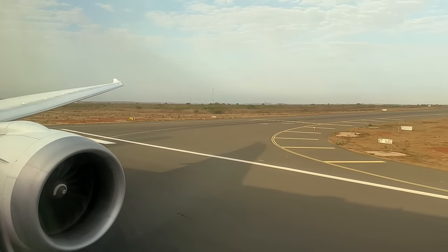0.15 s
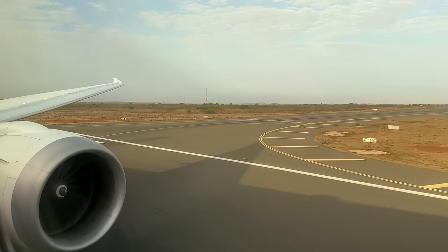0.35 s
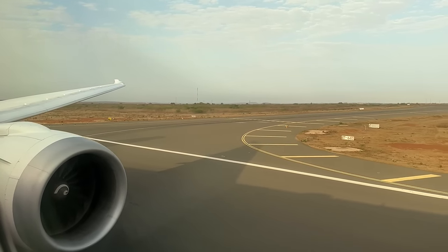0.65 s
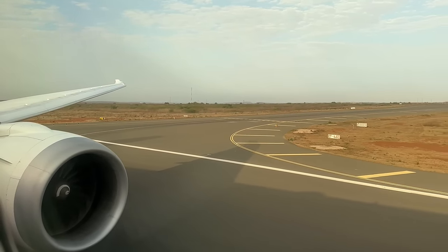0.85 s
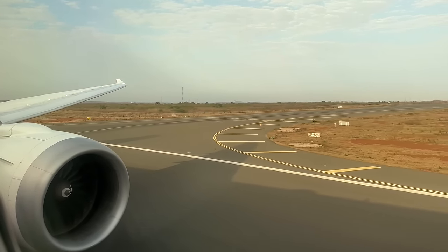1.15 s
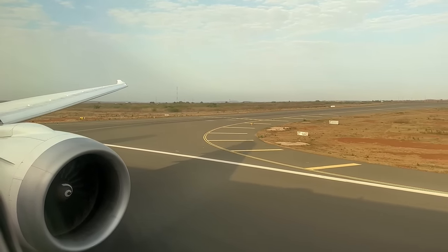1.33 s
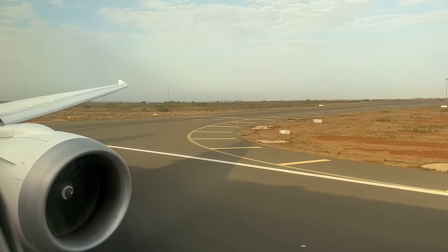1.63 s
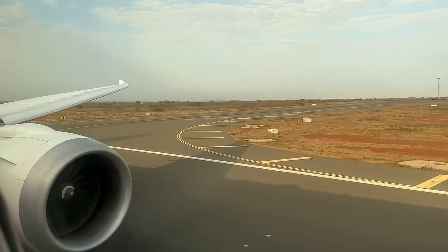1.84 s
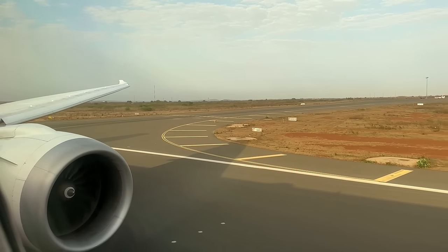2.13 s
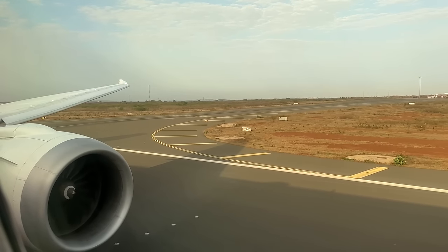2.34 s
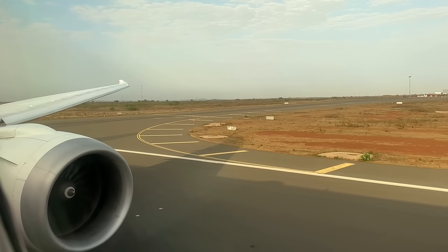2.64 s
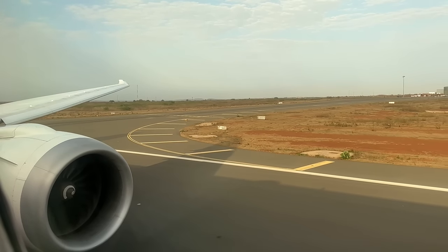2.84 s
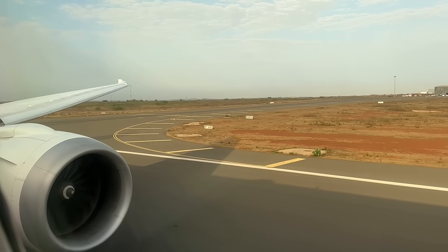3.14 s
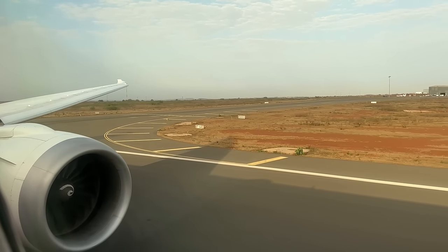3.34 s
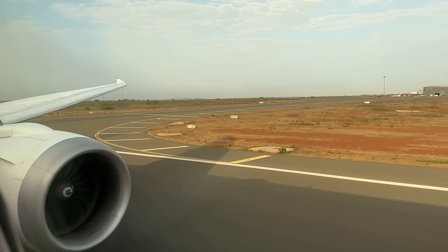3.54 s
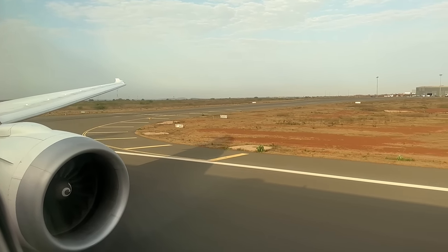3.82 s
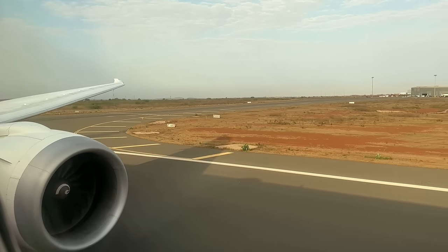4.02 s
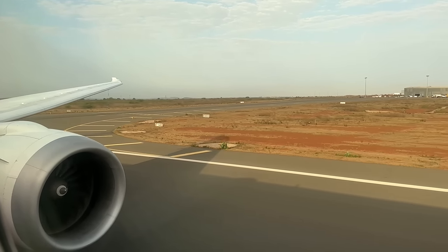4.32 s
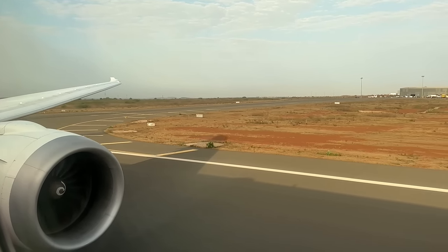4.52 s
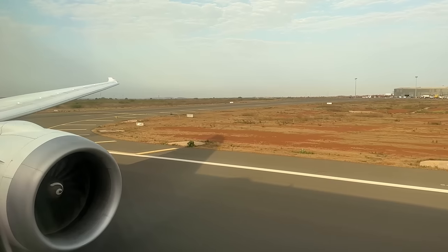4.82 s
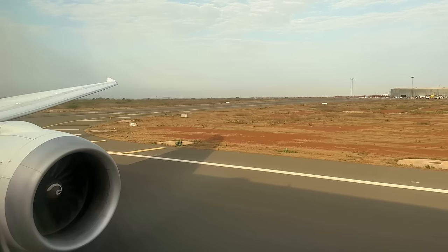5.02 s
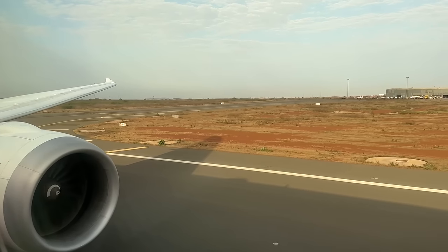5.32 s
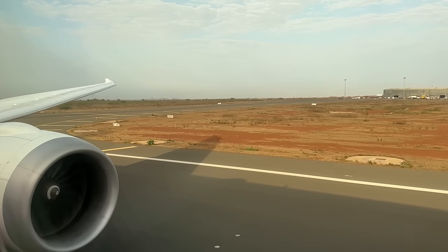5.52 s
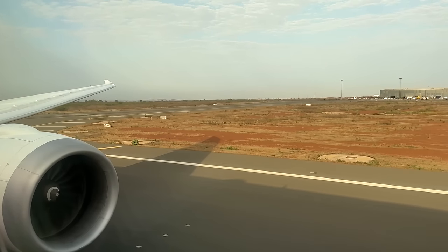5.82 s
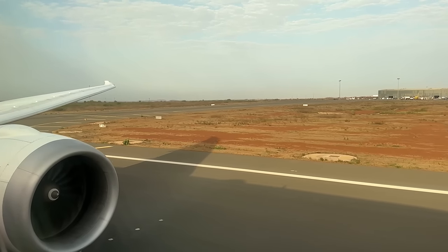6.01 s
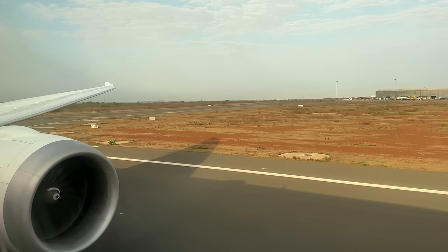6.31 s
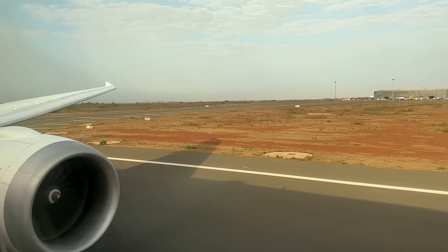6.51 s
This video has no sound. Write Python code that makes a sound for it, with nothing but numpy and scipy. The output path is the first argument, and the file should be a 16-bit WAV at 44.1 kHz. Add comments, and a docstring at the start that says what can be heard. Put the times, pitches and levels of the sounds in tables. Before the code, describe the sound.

Continuous low jet rumble fills a closed cabin, bass-heavy and slightly stronger on the left, under thin hiss, a faint steady whine and short wavering hums. Just before three seconds, hard hollow plastic knocks rattle close to the microphone. Afterwards the bass grows heavier and the engine tone rises gradually, then faster near the end, joined by a small motor's buzz.

```python
"""A low engine rumble fills an airliner cabin by a window ahead of the wing, as the engines begin
to spool up on the runway. Shaped noise makes the rumble, the roar through the wall, a treble hiss and the
air vents' whistle. Wavering sines hum for the machines, a pump and a motor, and climb for the fan's blade tone.
Noise snaps and decaying shell modes make a fitting clack nearby. All of it is spread between left and right."""
import sys
import numpy as np
from scipy import signal
from scipy.fft import rfft, irfft, next_fast_len
from scipy.io import wavfile
from scipy.ndimage import uniform_filter1d, map_coordinates

SR = 44100
rng = np.random.default_rng(int(sys.argv[2]) if len(sys.argv) > 2 else 0)


def transcribe(u):
    """Save the signal u as a 16-bit wav file named by the first command-line argument.

    u: samples, shape (n,) or (channels, n), limited to [-1, 1]; the rate is SR.
    q: integer samples, one column per channel.
    """
    v = np.clip(np.atleast_2d(u).T, -1, 1)
    q = np.round(v * 32767).astype(np.int16)
    wavfile.write(sys.argv[1], SR, q)


N = 293706
T = np.arange(N) / SR  # time of each sample, s


def amp(db):
    """Decibels to an amplitude factor."""
    return 10 ** (np.asarray(db) / 20)


def unit(x):
    """x scaled to an rms of 1."""
    return x / np.sqrt(np.mean(x ** 2) + 1e-20)


def ramp(start, length):
    """Climbs from 0 to 1 over length seconds."""
    return np.clip((T - start) / length, 0, 1)


def curves(rows):
    """One value per sample for each column after the time."""
    s, *cols = np.transpose(rows)
    return [np.interp(T, s, c) for c in cols]


def along(points, hz):
    """Each column after the frequency, read on a log axis."""
    f, *cols = np.transpose(points)
    return [np.interp(np.log(hz + 1), np.log(f + 1), c) for c in cols]


def wobble(rate):
    """A smooth random curve, rate knots a second."""
    steps = np.arange(0, N + 64, 64)
    knots = rng.standard_normal(int(N * rate / SR) + 4)
    smooth = map_coordinates(knots, [steps * rate / SR])
    return np.interp(np.arange(N), steps, smooth)


def filtered(x, response):
    """x shaped by a (possibly complex) response of frequency."""
    n = x.shape[-1]
    m = next_fast_len(n + 8192)
    return irfft(rfft(x, m) * response(np.fft.rfftfreq(m, 1 / SR)), m)[..., :n]


def panned(x, db):
    """Left louder than right by db, at the same mean power."""
    gain = amp(np.array([db / 2, -db / 2]))
    return x * (gain / np.sqrt(np.mean(gain ** 2, axis=0))).reshape(2, -1)


# Stereo image by frequency: balance, likeness and phase between left and right:
# (frequency [Hz], left-right balance [dB], likeness [0-1], left phase lead [rad])
STEREO_IMAGE = [(25, 0, .98, -.2), (60, -1, .99, -.55), (110, -3.3, .97, -.5), (160, -3.1, .9, -.65),
                (230, -6, .93, -.6), (290, -4.4, .8, -.3), (350, -6.6, .15, .5), (500, -8.5, .45, 1.9),
                (750, -7.3, .85, 2.05), (1000, -4.6, .7, 1.7), (1300, -7.3, .45, 2.4),
                (1700, -7.2, .5, 2.1), (2300, -3.8, .25, .75), (4000, -2.1, .15, .3), (4800, 1.2, .7, -.3),
                (5600, -3.5, .15, 0), (7500, -1.5, .5, .4), (8600, -.9, .7, 1.5), (9200, -.4, .95, 3.1),
                (10300, -.4, .95, 3.2), (11200, -.4, .95, 6.2), (13400, -.4, .95, 6.3),
                (14200, -.4, .95, 9.4), (16000, -.4, .95, 9.5)]


def in_stereo(pair):
    """Two sounds become left and right: the first reaches both sides, the second only adds to the right."""
    def mix(hz):
        balance_db, alike, lead = along(STEREO_IMAGE, hz)
        alike = np.clip(alike, 0, 1)
        shared = panned(np.array([np.exp(.5j * lead), alike * np.exp(-.5j * lead)]), balance_db)
        own = panned(np.array([0 * hz, np.sqrt(1 - alike ** 2)]), balance_db)
        return np.stack([shared, own], axis=1)
    return filtered(pair, mix).sum(axis=1)


def rush(spectrum, patchy_db):
    """Stereo noise of rms 1, with patches of random gain, silent outside its spectrum."""
    z = signal.stft(rng.standard_normal((2, N)), nperseg=512)[2]
    # smooth over 6 frequency bins, then 12 frames
    field = uniform_filter1d(rng.standard_normal(z.shape[1:]), 6, 0)
    field = uniform_filter1d(field, 12, 1)
    pair = signal.istft(z * amp(patchy_db * unit(field)), nperseg=512)[1][:, :N]

    def colour(hz):
        inside = (hz >= spectrum[0][0]) & (hz < spectrum[-1][0])
        return amp(along(spectrum, hz)[0]) * inside
    return unit(in_stereo(filtered(pair, colour)))


def tone(hz, db, wander_hz, flicker_db):
    """A sine around a given rms level whose pitch and strength waver."""
    phase = 2 * np.pi * (np.cumsum(hz + wander_hz * wobble(12)) / SR + rng.random())
    return np.sqrt(2) * amp(db + flicker_db * wobble(16)) * np.sin(phase)


# Colour of the engine rumble in the cabin's modes: (frequency [Hz], relative level per Hz [dB])
RUMBLE_COLOUR = [(18, -57), (30, -56), (42, -40.5), (58, -36.5), (68, -35.5), (80, -40.5), (95, -41.5),
                 (128, -40.5), (148, -46.5), (190, -43), (215, -45), (250, -45.5), (300, -50.5),
                 (340, -62.5)]
# Rumble fader, ahead of the thinning and deepening: (time [s], level [dB])
RUMBLE_LEVEL = [(0, -18.5), (.3, -20), (1.2, -18), (2.4, -19.5), (3.3, -18.5), (3.9, -20.5), (4.5, -23),
                (5.6, -22), (6.1, -20), (6.66, -21)]
# gain of the deepest rumble before and after thrust builds; middle and half-length of the change
DEEPEN_DB, DEEPEN_S, DEEPEN_OVER_S = (-2.5, 2.5), 3.75, 0.21
THIN_HZ, THIN_DB = 235, -1  # the top of the rumble thins as the bottom deepens


def engine_rumble():
    """Modal-coloured noise swells and sinks; as thrust builds its bottom deepens and its top thins."""
    rumble = amp(curves(RUMBLE_LEVEL)[0] + 0.69 * wobble(3.105)) * rush(RUMBLE_COLOUR, patchy_db=-0.58)
    thrust = ramp(DEEPEN_S - DEEPEN_OVER_S, 2 * DEEPEN_OVER_S)
    top = filtered(rumble, lambda hz: 1 - 1 / (1 + (hz / THIN_HZ) ** 12))
    rumble += (amp(THIN_DB * thrust) - 1) * top
    before, after = DEEPEN_DB
    depth_db = before + (after - before) * thrust
    bottom = filtered(rumble, lambda hz: 1 / (1 + (hz / 105) ** 6))
    return rumble + (amp(depth_db) - 1) * bottom


# Fader of a narrow noise band near 190 Hz, rising and falling unevenly: (time [s], level [dB])
LOW_BAND_LEVEL = [(0, -19.5), (.45, -27.5), (1.2, -33.5), (2.4, -31), (3.6, -39), (4.4, -22), (4.8, -29),
                  (5.9, -27.5), (6.06, -19.5), (6.16, -25), (6.25, -16.5), (6.4, -21.5), (6.48, -27.5),
                  (6.66, -25.5)]
LOW_BAND_HZ, LOW_BAND_WIDTH_HZ = 189.9, 28.5


def narrow_low_band():
    """Noise through one narrow resonant peak, rising and falling unevenly."""
    peak = lambda hz: 1 / (1 + ((hz - LOW_BAND_HZ) / LOW_BAND_WIDTH_HZ * 2) ** 2)
    band = unit(filtered(rng.standard_normal((2, N)), peak))
    return amp(curves(LOW_BAND_LEVEL)[0]) * in_stereo(band)


# Colour of the roar coming through the wall: (frequency [Hz], relative level per Hz [dB])
ROAR_COLOUR = [(340, -59), (400, -63), (470, -65), (600, -63), (720, -64), (900, -67.5), (1100, -70),
               (1250, -71), (1450, -72), (1700, -72), (1800, -77), (2300, -80), (2700, -87), (3200, -87)]
ROAR_DB, ROAR_DB_PER_S = -34, -0.21  # level at the start and its slow sinking


def wall_roar(flutter):
    """Mid-band noise through the wall, sinking slowly under a quick flutter."""
    level_db = ROAR_DB + ROAR_DB_PER_S * T + .3 * flutter + .3 * wobble(3)
    return amp(level_db) * rush(ROAR_COLOUR, patchy_db=.9)


# Colour of the treble hiss, thinner from about 9.7 to 13.7 kHz:
# (frequency [Hz], relative level per Hz [dB])
HISS_COLOUR = [(3200, -81.5), (3800, -85), (4550, -86), (4960, -84.5), (5100, -85.5), (5400, -85),
               (6200, -91.5), (7500, -90), (8800, -88), (9700, -100.5), (10600, -108), (11300, -100),
               (12400, -99), (13700, -103), (16000, -89)]
HISS_DB, HISS_DB_PER_S = -54.5, -0.3648  # level at the start and its slow sinking


def treble_hiss(flutter):
    """Treble noise sinking slowly, sharing the roar's quick flutter."""
    level_db = HISS_DB + HISS_DB_PER_S * T + 0.21 * flutter + 0.54 * wobble(2.7)
    return amp(level_db) * rush(HISS_COLOUR, patchy_db=1.7)


# The vents' whistle band: (frequency [Hz], relative level per Hz [dB])
WHISTLE_COLOUR = [(4590, -14), (4690, -5), (4715, 0), (4780, -1.5), (4860, 0), (4885, -6), (4930, -14)]
# Whistle fader: (time [s], level [dB])
WHISTLE_LEVEL = [(0, -59), (.3, -60.5), (.47, -56.5), (.7, -59), (2.3, -61), (3.1, -60.5), (3.8, -61),
                 (4.35, -63.5), (4.58, -57), (4.8, -64), (5.4, -65), (5.7, -63.5), (6, -63.5), (6.66, -65)]


def vent_whistle():
    """A narrow band of noise, breathy rather than pure, with a fast tremble."""
    level_db = curves(WHISTLE_LEVEL)[0] + 0.77 * wobble(24)
    return amp(level_db) * rush(WHISTLE_COLOUR, patchy_db=1.1)


# Steady machine tones: (frequency [Hz], level [dB], wander [Hz])
STEADY_TONES = [(78, -28, 3.5), (704, -60, 12), (1127, -60, 2), (4323, -78, 3), (5122, -81, 5),
                (7806, -82, 12), (8425, -84, 8), (8796, -83, 3), (11186, -85, 1.5)]


def machine_tones():
    """Sines held throughout, each wavering in pitch and strength."""
    return sum(tone(hz, db, wander, 2.5) for hz, db, wander in STEADY_TONES)


# Fader of a thin steady whine: (time [s], level [dB])
WHINE_LEVEL = [(0, -58), (2, -55), (4, -54), (4.7, -51.5), (5.5, -54), (6.66, -56)]


def thin_whine():
    """One wavering sine at a steady pitch, riding its fader."""
    return tone(1384, curves(WHINE_LEVEL)[0], 1.5, 2.5)


# Short tones that come and go: (start [s], end [s], frequency [Hz], level [dB])
SHORT_TONES = [(.2, .45, 975, -50), (1.0, 1.42, 1126, -49), (1.55, 1.8, 1128, -53), (1.42, 2.05, 1890, -57),
               (1.88, 2.14, 1126, -49), (2.05, 2.48, 1130, -56), (3.58, 3.92, 1125, -50),
               (4.7, 5.5, 1735, -60), (5.85, 6.4, 1114, -51)]


def passing_tones():
    """Brief sines, each faded in and out over a tenth of a second."""
    out = np.zeros(N)
    for start, end, hz, db in SHORT_TONES:
        gate = ramp(start, .1) * (1 - ramp(end - .1, .1))
        out += gate * tone(hz, db, 1.5, 1.5)
    return out


PUMP_S, PUMP_RISE_S, PUMP_FALL_S = (1.28, 3.5), 0.25, 0.21  # on and off, and the fades
PUMP_DB = (-32, -34.5)  # fundamental and octave
PUMP_HZ, PUMP_HZ_PER_S = 127.3, .45  # pitch at time zero and its slow rise


def pump():
    """A pump hums on a fundamental and its octave, its pitch creeping up."""
    running = ramp(PUMP_S[0], PUMP_RISE_S) * (1 - ramp(PUMP_S[1], PUMP_FALL_S))
    hz = PUMP_HZ + PUMP_HZ_PER_S * T
    return running * (tone(hz, PUMP_DB[0], 1, 2) + tone(2 * hz, PUMP_DB[1], 1, 1.5))


# Clacks and ticks of a fitting: (time [s], snap noise level at onset [dB], snap's strongest pitch [Hz],
# knock level [dB], knock's tilt [dB per octave], left-right balance beyond the stereo image's [dB])
CONTACTS = [(1.827, -43.5, 5300, -49, -2, 0), (2.2033, -40.5, 5240, -40, 0, -2.5),
            (2.6594, -25.5, 2193, -16, 2.5, 0), (2.664, -37, 1300, -19, -6, -4.5),
            (2.6717, -33, 3150, -10.5, -1.5, -2), (2.681, -38.5, 3140, -24, 7, -3),
            (2.702, -40, 2100, -23, -2, -5.5), (2.7128, -40, 1600, -34, 0, -1),
            (2.808, -34.5, 3130, -11, -1.5, 1.5), (2.8153, -29, 1590, -17, 4.5, -2),
            (2.8735, -41.5, 1200, -15.5, -3.5, 1), (2.909, -45, 1900, -24, 2, 0),
            (5.103, -50, 6460, -41, 0, 2), (5.712, -44, 3500, -35, 5, -0.5), (6.615, -41, 3500, -31, 6, -3)]
# Modes of the hollow shell: (frequency [Hz], level before tilt [dB], time to fall 60 dB [s])
SHELL_MODES = [(405, 1, .024), (618, 3, 0.016), (766, 4, 0.015), (1010, 2, .014), (1195, 1, 0.014),
               (1480, -4, .015), (1920, -9, 0.014), (2345, -13, 0.013)]
# Colour of the snap ahead of its peak: (frequency [Hz], relative level [dB])
SNAP_COLOUR = [(300, -25), (1200, -3), (2200, 2), (3200, -1), (4200, -6), (5200, -4), (6300, -11),
               (8800, -8), (13000, -13), (16000, -24)]
SNAP_PEAK_DB, SNAP_PEAK_OCTAVES = 8, .5  # lift and width of the snap's strongest part
RING_DB, RING_T60_S = 3, .042  # the catch rings at that pitch; level relative to the snap
KNOCK_LAG_CYCLES, KNOCK_RISE_S = .9, .0006  # the shell answers softly, its low modes last
TILT_ABOUT_HZ = 700


def clacks():
    """Each contact snaps the catch and knocks the hollow shell; the cabin scatters it briefly."""
    out = np.zeros((2, N + SR))
    t = np.arange(SR // 8) / SR
    f = np.fft.rfftfreq(len(t), 1 / SR)
    hz, db, t60 = np.transpose(SHELL_MODES)[:, :, None]
    late = np.maximum(t - KNOCK_LAG_CYCLES / hz, 0)
    swell = (1 - np.exp(-late / KNOCK_RISE_S)) ** 2
    modes = swell * amp(db - 60 * late / t60) * np.sin(2 * np.pi * hz * late)
    for s, snap_db, snap_hz, knock_db, tilt_db, pan_db in CONTACTS:
        peak = np.exp(-(np.log2((f + 1) / snap_hz) / SNAP_PEAK_OCTAVES) ** 2)
        colour = amp(along(SNAP_COLOUR, f)[0] + SNAP_PEAK_DB * peak)
        noise = unit(irfft(rfft(rng.standard_normal((2, len(t)))) * colour))
        snap = noise * amp(-60 * t / 0.025)
        snap[0] += amp(RING_DB - 60 * t / RING_T60_S) * np.sin(2 * np.pi * snap_hz * t)
        mode_db = tilt_db * np.log2(hz / TILT_ABOUT_HZ) + rng.normal(0, 0.62, hz.shape)
        knock = np.sum(amp(mode_db) * modes, axis=0)
        # a padded contact takes a moment to load
        rise = 1 - np.exp(-t / .0006)
        blow = rise * (amp(snap_db) * snap + amp(knock_db) * knock * [[1], [.3]])
        tail = amp(-60 * t / 0.21) * rng.standard_normal((2, len(t)))
        wet = signal.fftconvolve(blow[:1], tail / np.linalg.norm(tail[0]), axes=1)[:, :len(t)]
        # room on both sides, as the stereo phases spread the blow in time
        place = np.zeros((2, 4096 + 2 * len(t)))
        place[:, 2048:][:, :len(t)] = blow + amp(-10.5) * wet
        heard = in_stereo(place)[:, :place.shape[1]]
        out[:, round(s * SR) - 2048:][:, :place.shape[1]] += panned(heard, pan_db)
    return out[:, :N]


# Fan speed as its blade-passing tone: (time [s], frequency [Hz])
FAN_PITCH = [(3.2, 294), (4.2, 330), (4.55, 343), (5.27, 353), (5.6, 358), (6.05, 371), (6.33, 397),
             (6.48, 424), (6.58, 435), (6.66, 439)]
# Resonances of the wall, lifting a tone that passes them: (frequency [Hz], width [Hz], lift [dB])
WALL_RESONANCES = [(302, 12, 13), (334, 14, 8), (352, 5, 4), (375, 30, 10), (435, 8, 23), (695, 4, 15),
                   (716, 12, 12), (731, 12, 14), (796, 44, 18), (870, 20, 18), (1045, 40, 4)]
FAN_DB, FAN_FADE_IN_S = (-54, -61, -61), .3  # multiples 1 to 3 ahead of the wall's lift
FAN_WANDER_HZ, FAN_FLICKER_DB = 2.2, 2.5  # wander of the first multiple; the others in proportion


def fan():
    """The blade-passing tone and its multiples climb with the fan and swell at the wall's resonances."""
    blade_hz, = curves(FAN_PITCH)

    def wall_db(hz):
        return sum(db / (1 + (2 * (hz - mode) / width) ** 2) for mode, width, db in WALL_RESONANCES)

    stack = np.zeros(N)
    for k, db in enumerate(FAN_DB, 1):
        hz = k * blade_hz
        stack += tone(hz, db + wall_db(hz), FAN_WANDER_HZ * k, FAN_FLICKER_DB)
    return ramp(FAN_PITCH[0][0], FAN_FADE_IN_S) * stack


# Harmonics of a small motor: (multiple, level at its start [dB], drift [dB per s])
MOTOR_HARMONICS = [(2, -52, -4), (3, -50, 3), (4, -41, -32), (5, -54, -4)]
MOTOR_S, MOTOR_HZ = 6.36, 334.5  # start time and fundamental


def small_motor():
    """A small motor starts: steady harmonics, each drifting in level."""
    since = (T - MOTOR_S).clip(0)
    stack = sum(tone(k * MOTOR_HZ, db + drift * since, 2, 1.5) for k, db, drift in MOTOR_HARMONICS)
    return ramp(MOTOR_S, .03) * stack


def scene():
    """Noise beds, tones and clacks together in stereo."""
    flutter = wobble(14)  # shared by roar and hiss
    beds = engine_rumble() + narrow_low_band() + wall_roar(flutter) + treble_hiss(flutter) + vent_whistle()
    tones = machine_tones() + thin_whine() + passing_tones() + pump() + fan() + small_motor()
    return beds + in_stereo(np.array([tones, tones])) + clacks()


# the bass folds into the middle for a moment, then leans left and spreads again
FOLD_S, FOLDED_S, FOLDED_WIDTH, WIDTH_AFTER = 4.86, .29, .27, .82  # start, length, side gains
LEAN_DB, LEAN_AFTER_DB, LEAN_BACK_S = .4, 3.5, 1.3  # constant lean, extra lean, its return
TOP_HZ = 15780


def record(dry):
    """The bass folds, leans and spreads again; nothing passes above the band limit."""
    fold, spread = ramp(FOLD_S, .06), ramp(FOLD_S + FOLDED_S, .12)
    width = 1 - (1 - FOLDED_WIDTH) * fold + (WIDTH_AFTER - FOLDED_WIDTH) * spread
    lean_db = LEAN_DB + LEAN_AFTER_DB * spread * (1 - ramp(FOLD_S + FOLDED_S, LEAN_BACK_S))
    bass = filtered(dry, lambda hz: 1 / (1 + (hz / 240) ** 8))
    mid = (bass[0] + bass[1]) / 2
    side = (bass[0] - bass[1]) / 2 * width
    moved = np.array([mid + side, mid - side]) * amp([lean_db / 2, -lean_db / 2])
    return filtered(dry - bass + moved, lambda hz: hz < TOP_HZ)


dry = scene()
out = record(dry)
transcribe(out)
```